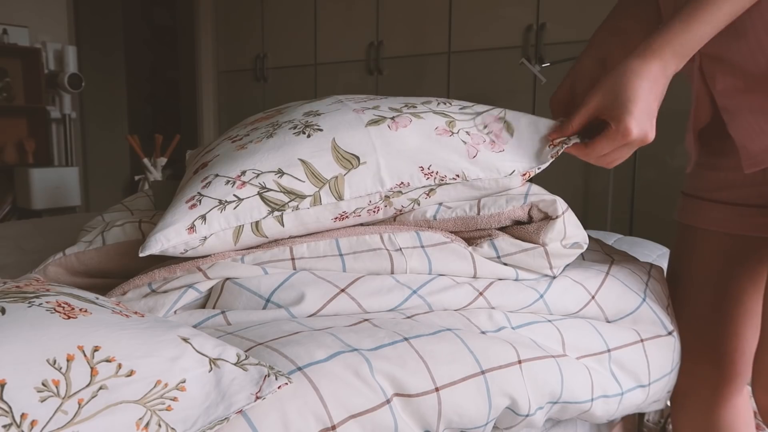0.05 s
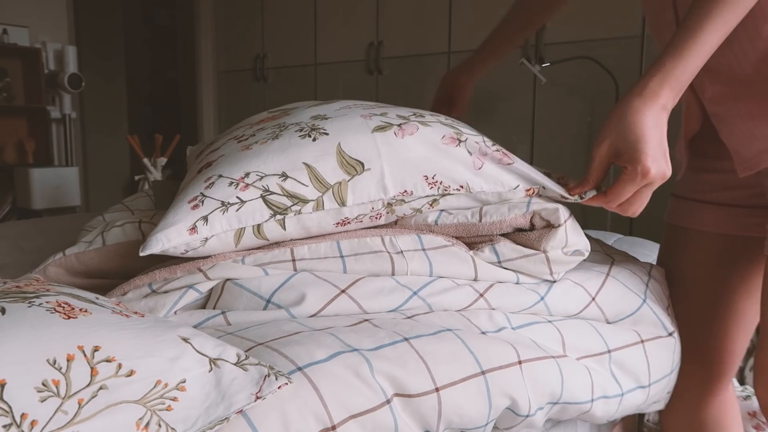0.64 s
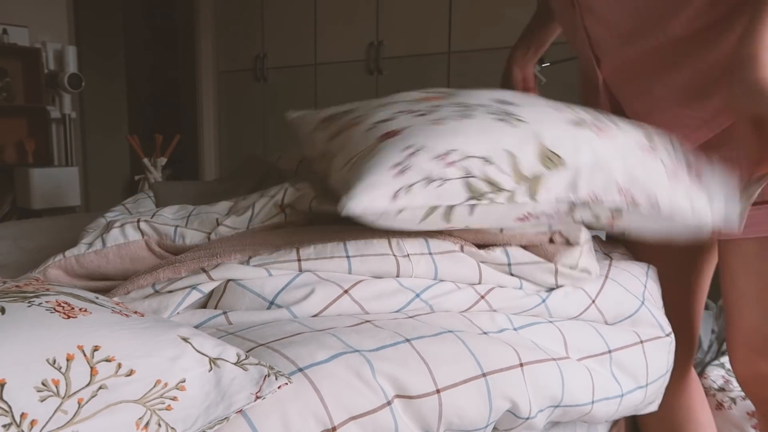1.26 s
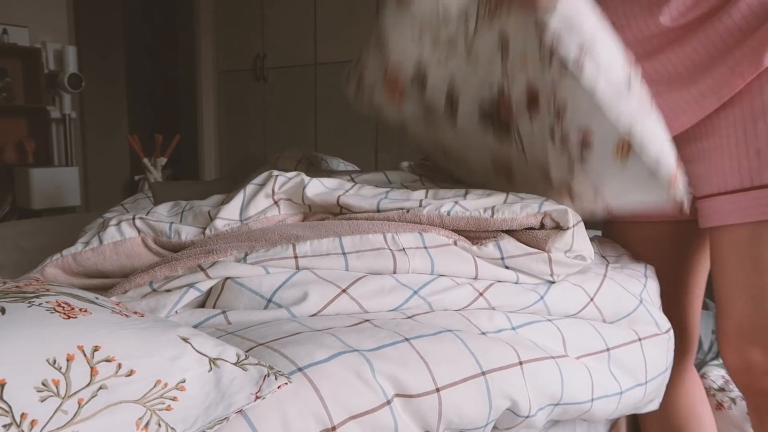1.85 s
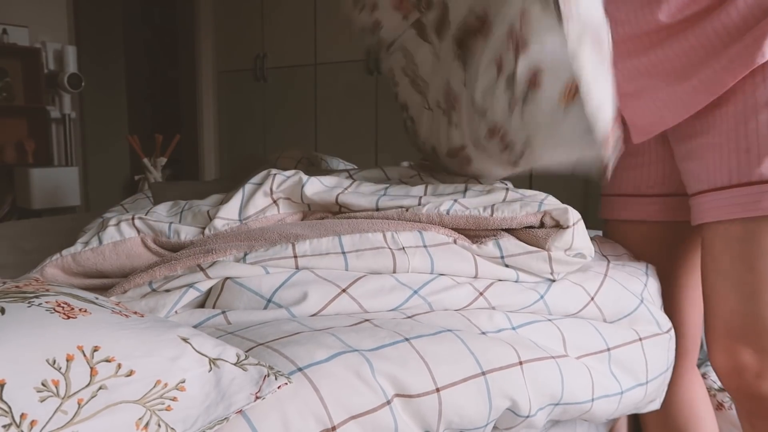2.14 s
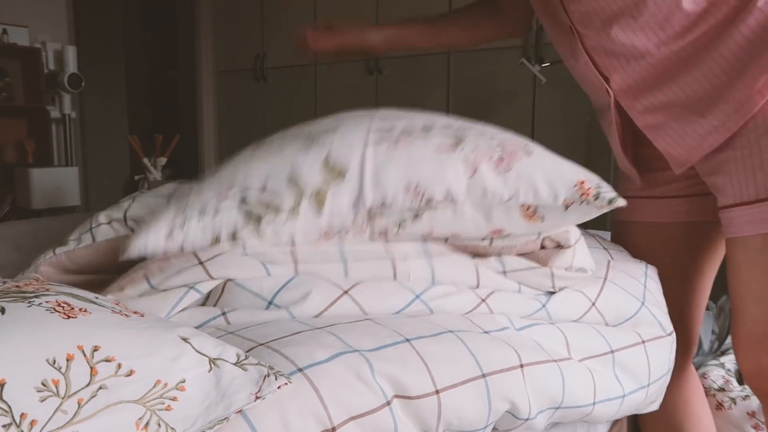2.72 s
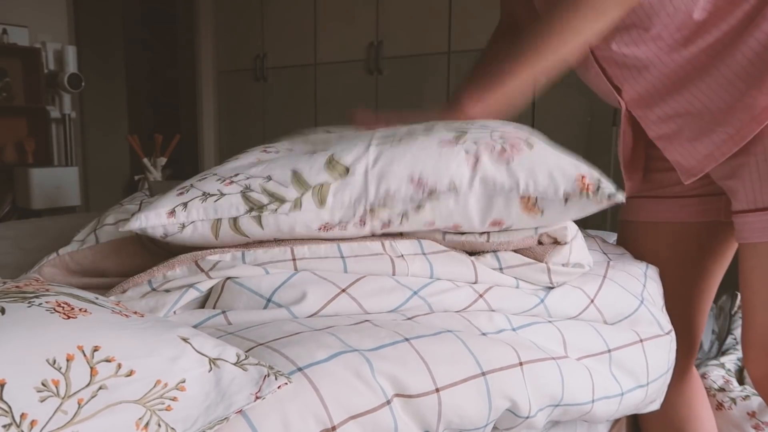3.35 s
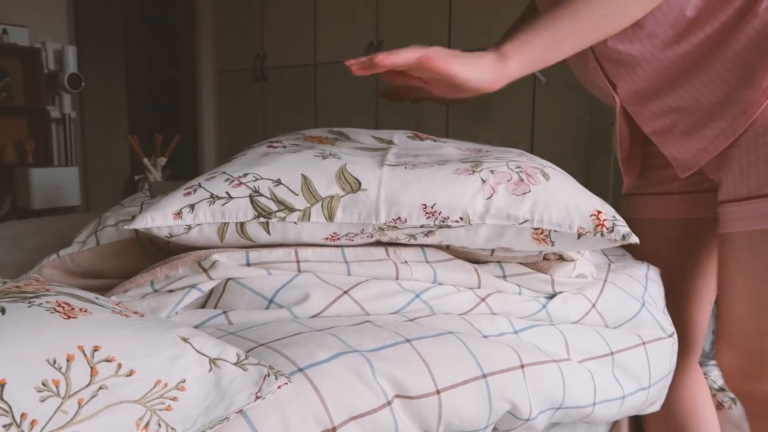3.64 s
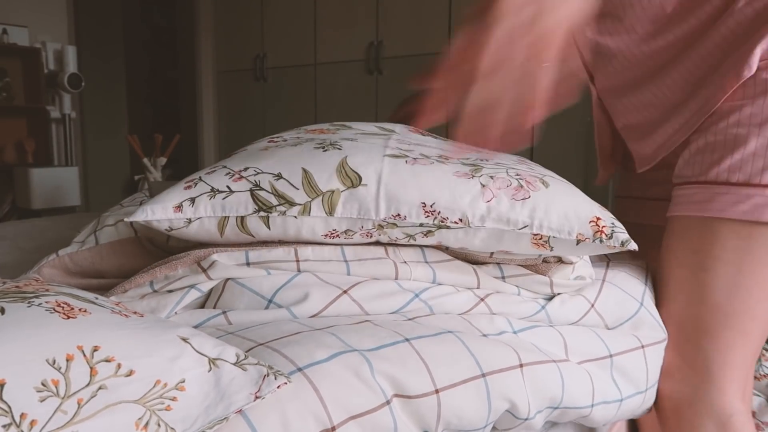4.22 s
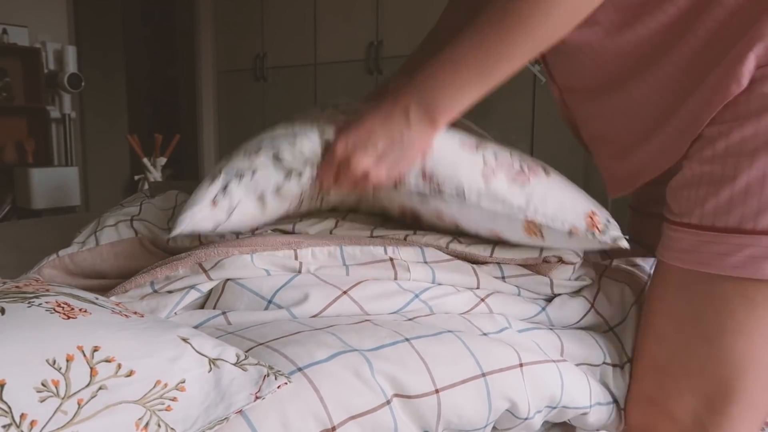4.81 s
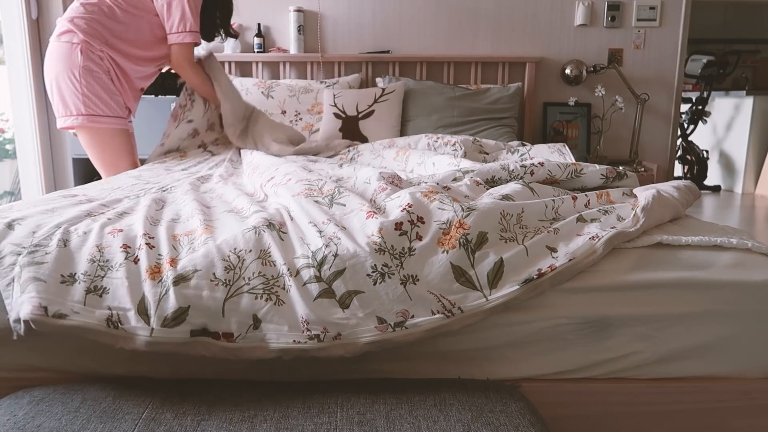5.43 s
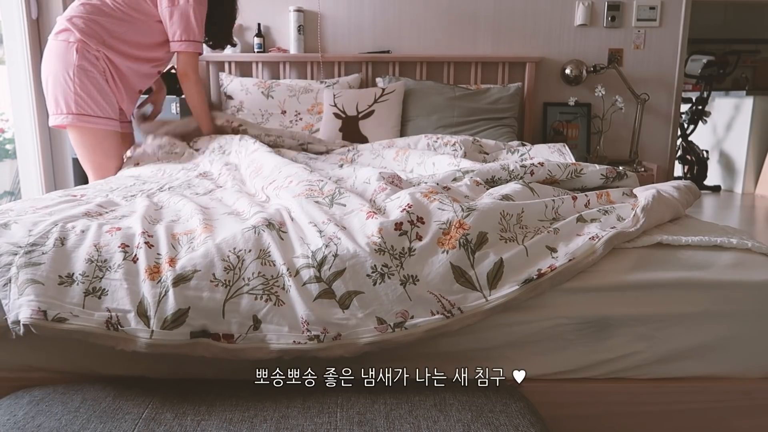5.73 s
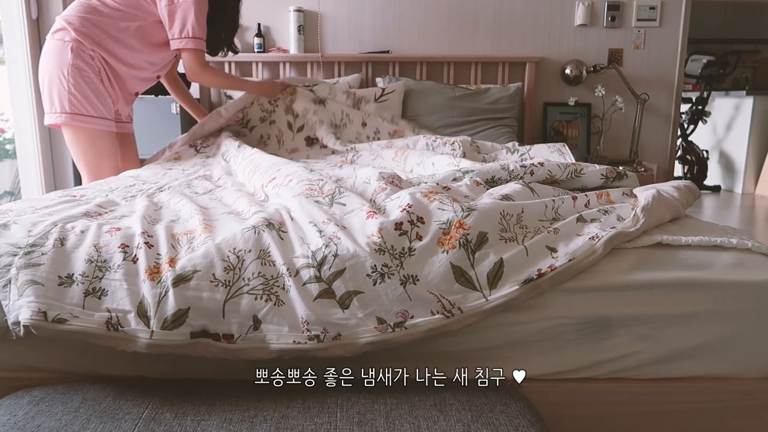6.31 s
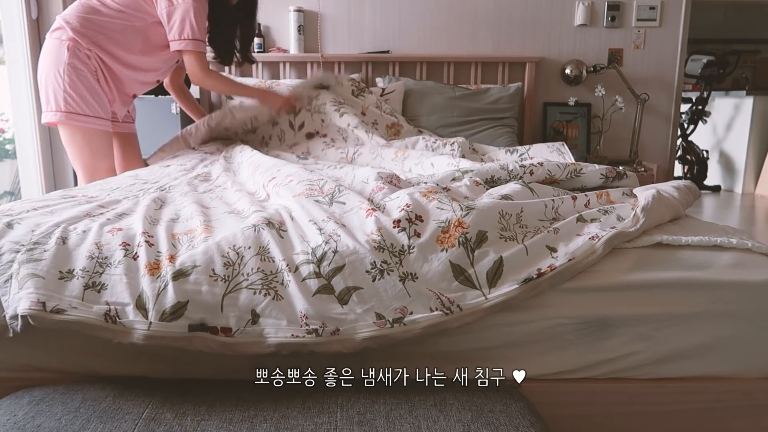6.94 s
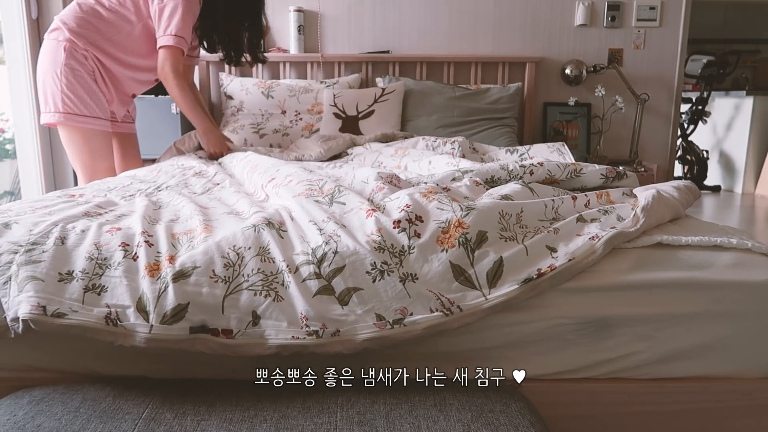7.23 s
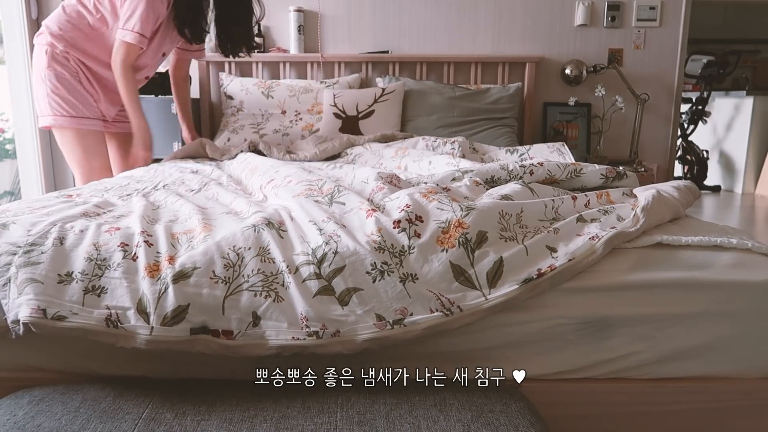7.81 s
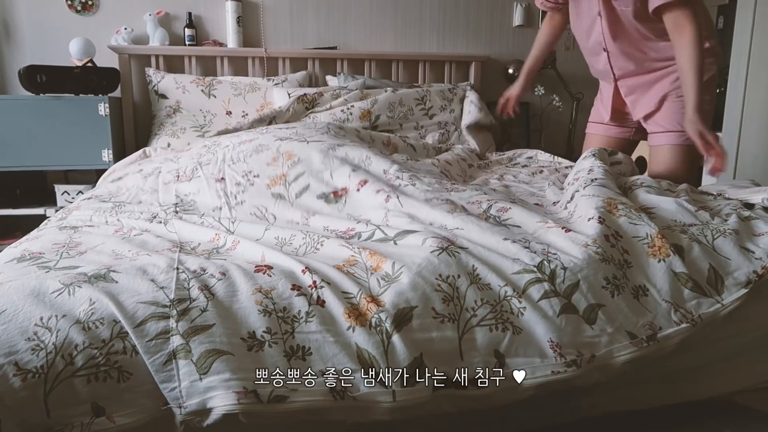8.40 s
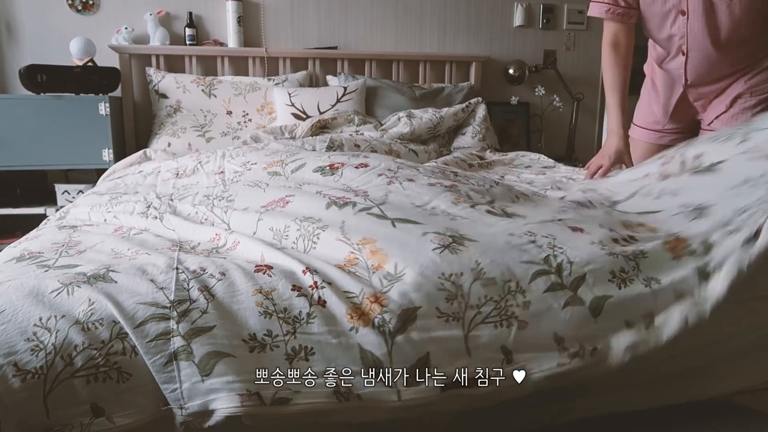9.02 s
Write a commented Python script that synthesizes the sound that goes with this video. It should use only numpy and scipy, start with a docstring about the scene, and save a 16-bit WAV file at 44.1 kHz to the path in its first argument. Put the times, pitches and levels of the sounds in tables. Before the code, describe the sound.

In a quiet bedroom, a pillowcase zip is pulled shut with a brief buzz. Cotton swishes as the pillow is lifted and shaken, then it drops onto the bed with a dull thud. A hand pats it three times close to the microphone, each sharp thump pushing out a puff of air. Afterwards a duvet rustles and flops softly further away over a faint low hum.

```python
"""Making a bed

In a quiet bedroom a pillowcase zip is pulled shut, its slider ticking over the teeth. The pillow is
picked up, shaken and dropped, then patted three times; each pat thumps and presses a hiss of air out
through the cotton. Then the duvet is tugged straight further off, rustling and flopping over a low hum."""
import sys
import numpy as np
from scipy import signal
from scipy.fft import rfft, irfft, next_fast_len
from scipy.io import wavfile
from scipy.ndimage import uniform_filter1d

SR = 44100
rng = np.random.default_rng(int(sys.argv[2]) if len(sys.argv) > 2 else 0)


def dump_mix(stems):
    """Bounce the given channels to the path in sys.argv[1] as a 16-bit WAV at rate SR."""
    frames = np.atleast_2d(stems).T  # one column per channel
    limited = np.clip(frames, -1, 1)  # hard clip at full scale
    pcm = np.round(limited * 32767).astype(np.int16)
    wavfile.write(sys.argv[1], SR, pcm)


N = 399546
T = np.arange(N) / SR


def undb(db):
    """Turn decibels into a gain."""
    return 10 ** (np.asarray(db) / 20)


def unit(x):
    """Scale a sound to an average (rms) level of 1."""
    return x / np.sqrt(np.mean(x ** 2))


def colour(x, points, tilt_db=0):
    """Shape the tone along (pitch_hz, level_db) points, tilted by tilt_db per octave."""
    size = next_fast_len(len(x))
    octave = np.log2(np.maximum(np.fft.rfftfreq(size, 1 / SR), 1))
    hz, db = np.transpose(points)
    gain = undb(np.interp(octave, np.log2(hz), db + tilt_db * np.log2(hz / hz[0])))
    bass_cut = np.minimum(2 ** octave / hz[0], 1) ** 2
    return irfft(rfft(x, size) * gain * bass_cut, size)[:len(x)]


def resonate(x, hz, width):
    """Keep the part of a sound near one pitch."""
    return signal.lfilter(*signal.iirpeak(hz, hz / width, fs=SR), x)


def band(size, hz, width):
    """Noise around one pitch, filtered twice for steep edges."""
    noise = rng.standard_normal(size)
    return unit(resonate(resonate(noise, hz, 0.8 * width), hz, 0.8 * width))


def fade(t, t60):
    """Die away by 60 dB every t60 seconds."""
    return np.exp(-np.log(1000) * t / t60)


def rise(t, rise_s):
    """Climb from 0 and level off at 1."""
    return 1 - np.exp(-t / rise_s)


def bell(middle_s, half_s):
    """A movement gathers speed and slows again."""
    return np.exp(-((T - middle_s) / half_s) ** 2 / 2)


def wobble(rate_hz):
    """A smooth random wobble, about 1 in size."""
    step = max(int(SR / rate_hz), 1)
    stairs = np.repeat(rng.standard_normal(N // step + 1), step)
    return unit(uniform_filter1d(stairs, step)[:N])


def fibres(size, spread_db):
    """Many tiny slips of uneven strength."""
    slips = rng.standard_normal(size)
    return unit(slips * undb(spread_db * np.minimum(rng.exponential(size=size), 2 * np.pi)))


def add(track, start_s, sound):
    """Mix a sound in at a given time."""
    i = int(start_s * SR)
    track[i:i + len(sound)] += sound[:N - i]


def echoes(x, t60, gap_s=0.00304):
    """A wash of reflections that starts after a short gap."""
    t = T[:SR]
    tail = rng.standard_normal(SR) * fade(t, t60) * (t > gap_s)
    return signal.fftconvolve(x, tail / np.linalg.norm(tail))[:N]


def stereo(x, width, direct, t60):
    """Left and right differ: in phase for direct sound, by chance for scattered sound."""
    shifted = signal.hilbert(x, next_fast_len(N)).imag[:N]  # every wave moved a quarter cycle
    scattered = echoes(x * wobble(250), t60, gap_s=0)  # moving cloth keeps changing the scatter
    side = colour(-direct * shifted + np.sqrt(1 - direct ** 2) * scattered, width)
    return np.array([x - side, x + side])


# Tone of the room's air: pitch_hz, level_db
ROOM_AIR = [(22, -22), (35, -0.5), (52, 4), (90, -0.5), (170, -6), (360, -5), (460, -7.5), (540, -12),
            (820, -12), (1100, -16.5), (1500, -15.5), (2400, -16.5), (4000, -26.5), (8200, -34),
            (12000, -43), (15000, -53)]


def room_tone(air_db=-49.5, hum_hz=118, whine_hz=13010, whine_db=-87):
    """Steady air noise, a very thin whine and a wavering hum, plainer by the far side of the bed."""
    air = unit(colour(rng.standard_normal(N), ROOM_AIR)) * undb(air_db + 0.12 * wobble(15))
    hum_db = np.interp(T, [4.8, 5.1, 7.9, 8.1], [-61.5, -53, -52, -78])  # drops away near the end
    hum = np.sin(2 * np.pi * np.cumsum(hum_hz + 11 * wobble(30)) / SR) * undb(hum_db + 2 * wobble(16))
    whine = np.sin(2 * np.pi * np.cumsum(whine_hz + 25 * wobble(40)) / SR) * undb(whine_db)
    return air + np.sqrt(2) * (hum + whine)


def sliding(movements, rest_db):
    """How loud the cloth is: every movement adds to a faint steady stirring."""
    power = sum((undb(db) * bell(s, half_s)) ** 2 for s, half_s, db in movements)
    return np.sqrt(undb(rest_db) ** 2 + power)


# Tone of swishing fibres: pitch_hz, level_db
SWISH_TONE = [(400, -3), (750, -9.5), (1200, -7), (1700, -3.5), (2800, -5), (4000, -10.5), (5900, -18),
              (9800, -32), (12400, -55), (15000, -47)]
# Tone of rumbling folds: pitch_hz, level_db
FOLD_TONE = [(60, 3.5), (130, -1.5), (180, 4.5), (260, 3), (450, -5), (800, -7.5), (1300, -16), (2500, -41)]
# Lifts and tugs that slide cotton over cotton: middle_s, half_length_s, swish_db, rumble_db
SLIDES = [(0.224, 0.15, -61, -73), (1.18, 0.14, -51.5, -74), (1.395, 0.057, -48, -51),
          (1.561, 0.024, -43.5, -49), (1.624, 0.095, -49, -50), (1.882, 0.12, -42.5, -46),
          (2.02, 0.061, -43.5, -50), (2.1, 0.018, -34.5, -42.5), (2.245, 0.065, -39.5, -43),
          (2.381, 0.078, -45.5, -54), (2.733, 0.15, -47.5, -68), (4.237, 0.02, -55, -62),
          (4.355, 0.01, -54, -65), (4.544, 0.036, -50.5, -46.5), (4.65, 0.075, -53.5, -50.5),
          (4.848, 0.082, -51.5, -55), (5.01, 0.018, -54, -60), (5.117, 0.059, -58.5, -52),
          (5.302, 0.044, -56.5, -48.5), (5.57, 0.067, -52.5, -47.5), (5.885, 0.02, -59, -51),
          (6.014, 0.02, -63, -58), (6.26, 0.049, -61, -51.5), (6.385, 0.044, -60, -47.5),
          (6.58, 0.05, -65, -51.5), (6.907, 0.048, -57.5, -44), (6.98, 0.039, -58, -51),
          (7.217, 0.036, -65, -60), (7.55, 0.04, -60, -59), (8.02, 0.045, -56, -46),
          (8.094, 0.036, -54.5, -59), (8.243, 0.025, -61, -57), (8.515, 0.073, -53.5, -67),
          (9.032, 0.091, -60, -50.5)]
# Strokes of a hand over cotton: middle_s, level_db, half_length_s, pitch_hz, width_hz
STROKES = [(1.547, -44, 0.0071, 490, 550), (1.78, -42, 0.031, 700, 603), (1.85, -52.5, 0.1, 800, 600),
           (2.106, -31.5, 0.0049, 700, 900), (2.102, -35.5, 0.005, 2600, 2800),
           (2.3067, -26, 0.003, 690, 700), (2.307, -42, 0.0026, 2980, 2600), (2.315, -37, 0.014, 540, 298),
           (2.83, -34, 0.011, 470, 330), (2.836, -41.5, 0.019, 2300, 2940), (3.892, -47, 0.003, 2200, 2600),
           (5.125, -48, 0.013, 704, 500), (6.904, -60, 0.028, 905, 900), (8.085, -60, 0.022, 2200, 1600),
           (8.44, -57, 0.023, 2500, 2400), (8.49, -58.5, 0.034, 5500, 3020),
           (8.566, -55, 0.017, 2200, 2800), (8.747, -54, 0.028, 1390, 2200)]


def rustle(close, slide_db=-1, catch_db=1.2):
    """Cloth slides in small catches: fibres swish, folds rumble, hand strokes swell and fade."""
    middle_s, half_s, swish_db, rumble_db = np.transpose(SLIDES)
    swish = unit(colour(fibres(N, spread_db=1), SWISH_TONE))
    swish *= sliding(zip(middle_s, half_s, swish_db + slide_db), rest_db=-67)
    folds = unit(colour(fibres(N, spread_db=3.5), FOLD_TONE))
    rest_db = np.interp(close, [0, 1], [-56, -64])  # the duvet stirs more than the pillow
    folds *= sliding(zip(middle_s, half_s, rumble_db + slide_db), rest_db)
    strokes = sum(undb(db) * band(N, hz, width) * bell(s, half) for s, db, half, hz, width in STROKES)
    return (swish + folds + strokes) * undb(catch_db * wobble(60))


# Flops of the pillow or duvet: start_s, level_db, pitch_hz, fade_s
FLOPS = [(1.54, -36, 235, 0.061), (1.954, -35, 243, 0.19), (2.191, -36, 271, 0.085),
         (2.303, -35.5, 139, 0.21), (2.782, -32, 188, 0.097), (2.801, -21, 58, 0.11),
         (2.814, -27.5, 218, 0.09), (3.032, -31, 57.5, 0.37), (3.461, -24.5, 58.6, 0.13),
         (4.005, -35, 267.4, 0.18), (5.117, -37.5, 158, 0.075), (5.311, -46, 159, 0.22),
         (5.426, -43.5, 124, 0.046), (5.604, -45, 115, 0.21), (5.809, -35.5, 69, 0.33),
         (6.537, -43, 129, 0.21), (6.59, -42.5, 133, 0.12), (6.875, -44, 160, 0.21), (6.96, -38, 119, 0.19),
         (7.17, -46.5, 200, 0.11), (7.655, -45.5, 445, 0.092), (8.131, -38, 86, 0.15),
         (8.206, -45.5, 66.5, 0.41), (8.723, -43, 294, 0.06)]


def flops(rise_s=0.0043, looseness=0.64):
    """Heavy bedding pushes out a few slow, uneven waves of air."""
    t, out = T[:SR // 2], np.zeros(N)
    for start_s, db, hz, fade_s in FLOPS:
        shape = rise(t, rise_s) ** 2 * fade(t, fade_s)
        flap_tone = [(hz / 2, -4), (hz, 0), (hz * 2, -8), (hz * 10, -30), (hz * 50, -80)]
        flap = unit(colour(rng.standard_normal(len(t)), flap_tone))
        wave = np.sin(2 * np.pi * hz * t) + looseness * flap
        add(out, start_s, undb(db) * shape / shape.max() * wave)
    return out


# The zip's pull, moment by moment: time_s, tooth_rate_hz, lowest_tone_db, octave_above_db
ZIP_PULL = [(0.33, 485, -57, -65), (0.348, 548, -44.5, -50), (0.41, 1005, -42, -35),
            (0.424, 1002, -58, -37), (0.48, 1125, -47, -45), (0.524, 1181, -35, -34.5),
            (0.56, 1249, -45, -34), (0.582, 1187, -24.5, -31.5), (0.6, 1153, -39.5, -48),
            (0.64, 1114, -34.5, -31), (0.662, 989, -31, -34.5), (0.676, 969, -35, -39),
            (0.724, 1017, -36, -42), (0.756, 984, -33, -39), (0.77, 1002, -27.5, -35.5),
            (0.8, 1415, -42, -40), (0.836, 1437, -37.5, -44), (0.87, 1432, -61, -58)]
# Tone of the zip's overtones: pitch_hz, level_db
ZIP_TONE = [(900, -13), (1400, -18), (2300, 6), (3100, -4), (3900, -8), (4700, -13), (7000, -15),
            (9000, -35)]
# Tone of its rasping tape: pitch_hz, level_db
RASP_TONE = [(200, 6.5), (500, 0.5), (1000, -2), (2200, 3.5), (3400, 1.5), (5000, -3.5), (7200, -8),
             (9500, -15), (11000, -29), (15000, -27)]


def zipper(start_s=0.28, end_s=0.869, attack_s=0.07, release_s=0.05, flutter_db=2.6):
    """The slider ticks over each tooth, so pitch follows speed; the tape rasps after every tick."""
    times, *columns = np.transpose(ZIP_PULL)
    hz, lowest_db, octave_db = [np.interp(T, times, column) for column in columns]
    pull = np.clip((T - start_s) / attack_s, 0, 1) * np.clip((end_s - T) / release_s, 0, 1)
    from_middle_s = np.clip(T, start_s, end_s) - (start_s + end_s) / 2
    # Count the teeth passed. They are uneven, so each tone flutters on its own.
    teeth = np.cumsum(hz * (1 + 0.013 * wobble(450))) / SR + 0.022 * wobble(700)
    low, high = np.zeros(N), np.zeros(N)
    for k, db in [(1, lowest_db + 0.2), (2, octave_db + 1)]:
        low += np.sin(2 * np.pi * k * teeth) * undb(db + flutter_db * wobble(129.4))
    # Overtones and rasp grow with speed and as the tape tightens.
    for k in range(3, 8):
        uneven_db = flutter_db * wobble(169.6) + 2.2 * wobble(30.5)
        tighten_db = 3 * (k + 2.5) * from_middle_s
        high += 2 / k * np.sin(2 * np.pi * k * teeth) * undb(uneven_db + tighten_db)
    high = colour(high, ZIP_TONE) * undb(-38.5) * np.minimum(hz / 1000, 1) ** 2
    buzz = np.sqrt(2) * (low * np.sqrt(pull) + high * pull ** 2)
    rasp = unit(colour(rng.standard_normal(N) * np.exp(-(teeth % 1)), RASP_TONE))
    rasp_db = -44 + 6 * from_middle_s + 3 * np.log2(hz / 1000) + 2.2 * wobble(121.2)
    return buzz + rasp * np.sqrt(pull) * undb(rasp_db)


# Tone of the crunching filling: pitch_hz, level_db
CRUNCH_TONE = [(25, -1), (50, 13.5), (100, -5.5), (160, 6), (280, -3), (550, -4.5), (900, -12), (1300, -16),
               (2000, -18), (4000, -26.5), (8000, -46), (15000, -63)]
# Tone of air pressed through cotton: pitch_hz, level_db
HISS_TONE = [(100, 9), (400, 11), (1000, 3.5), (2200, 1.5), (3500, -1.5), (5500, -5), (8000, -11.5),
             (11000, -19.5), (15000, -31)]
# The pillow is grabbed, shaken, dropped and patted: start_s, crunch_db, tilt_db_per_octave, air_db, sink_s
SQUASHES = [(1.54, -41, 3.5, -61.5, 0.022), (2.096, -38, 3, -39, 0.036), (2.302, -39, 7, -46, 0.022),
            (2.799, -20, 0, -51.5, 0.062), (3.0238, -18.5, 1.7, -32.5, 0.075), (3.4595, -23, 3, -35, 0.1),
            (3.897, -28.5, 1, -32.5, 0.091)]


def squashes(air_fade_s=0.25, brighten_s=0.022):
    """The filling crunches, longer the deeper the hand sinks, and air hisses out through the weave."""
    t, out = T[:SR // 2], np.zeros(N)
    for start_s, crunch_db, tilt_db, air_db, sink_s in SQUASHES:
        crunch = unit(colour(fibres(len(t), spread_db=1), CRUNCH_TONE, tilt_db))
        crunch *= rise(t, 0.0022) * fade(t, 4.14 * sink_s)
        hiss = unit(colour(fibres(len(t), spread_db=3), HISS_TONE))
        hiss *= rise(t, 0.013) * fade(np.maximum(t - sink_s, 0), air_fade_s)
        puff = undb(crunch_db) * crunch + undb(air_db) * hiss
        dull = colour(puff, [(20, 0), (3500, 0), (7000, -8), (14000, -20)])
        add(out, start_s, dull + (puff - dull) * rise(t, brighten_s))
    return out


# Pops of air trapped under the palm: start_s, level_db, pitch_hz, width_hz, fade_s
SMACKS = [(3.033, -27, 830, 380, 0.087), (3.033, -25, 2400, 2950, 0.017), (3.044, -17, 2170, 2380, 0.02),
          (3.461, -27, 2900, 1300, 0.022), (3.465, -19, 1195, 230, 0.15), (3.4652, -13, 1850, 900, 0.014),
          (3.4665, -18, 4130, 1500, 0.0065), (3.897, -24, 950, 298, 0.12), (3.898, -32, 1730, 800, 0.12),
          (3.898, -26, 485, 130, 0.097)]


def smacks(rise_s=0.00038):
    """The pocket of air under the palm rings briefly as it is forced out."""
    t, out = T[:SR // 3], np.zeros(N)
    for start_s, db, hz, width, fade_s in SMACKS:
        add(out, start_s, undb(db) * band(len(t), hz, width) * rise(t, rise_s) * fade(t, fade_s))
    return out


# Pitches at which pillow and bedding ring: pitch_hz, width_hz, level_db
PILLOW_RINGS = [(53.3, 18, 11), (98, 25, 1), (153, 11, 8.5), (214, 43, -0.5), (242, 37, 4.5), (298, 40, -4),
                (463, 15, -18), (662, 20, 5.5), (865, 18, 5.5), (1120, 28, -16), (1306, 58, 0),
                (2020, 220, 1)]
# Fingertips, fingers and palm land in turn, or the pillow hits the bed: time_s, level_db, sharpness_hz
CONTACTS = [(1.5502, -33, 330), (2.1041, -26.5, 600), (2.3068, -24, 480), (2.8058, -21.5, 161),
            (2.816, -26, 111), (3.0265, -20, 450), (3.035, -15.5, 398), (3.0463, -7, 295),
            (3.4612, -18, 260), (3.4635, -21, 520), (3.4662, -17, 1000), (3.4673, -4, 600),
            (3.8892, -34, 300), (3.897, -24.5, 300), (3.8996, -12, 520), (3.907, -37, 700),
            (3.917, -20.5, 260)]


def thumps(ring_db=1):
    """Each contact pushes air and sucks it back, more slowly when softer, and rings the bedding."""
    push = np.zeros(N)
    for time_s, db, hz in CONTACTS:
        age = 2 * np.pi * hz * (T - time_s)
        pulse = -age / (1 + age ** 2) ** 2
        push += undb(db) * pulse / pulse.max()
    ring = sum(undb(db) * resonate(push, hz, width) for hz, width, db in PILLOW_RINGS)
    return push + undb(ring_db) * ring


def snaps(snap_db=-17, fade_s=0.006, rise_s=0.00051):
    """The tight cotton cracks under those same contacts, louder the sharper they land."""
    crack_tone = [(500, -15), (1200, 8), (2400, 0), (4000, 18), (6000, -14), (9000, -24), (14000, -21)]
    t, out = T[:SR // 10], np.zeros(N)
    for time_s, db, hz in CONTACTS:
        crack = unit(colour(rng.standard_normal(len(t)), crack_tone)) * rise(t, rise_s) * fade(t, fade_s)
        add(out, time_s - 2 * rise_s, undb(db + snap_db) * hz / 1000 * crack)
    return out


def hollow(x, dip_db=-13):
    """Weaken two narrow bands between the pillow's ringing pitches, so blows sound hollow."""
    for hz, width in [(184, 30), (550, 80)]:
        x = x - (1 - undb(dip_db)) * resonate(x, hz, width)
    return x


# How much left and right differ for near and for far sounds: pitch_hz, difference_db
NEAR_WIDTH = [(60, -66), (200, -52), (700, -23), (2400, -17), (4400, -5), (8000, 1.5), (11000, 10.5),
              (15000, 11)]
FAR_WIDTH = [(60, -34), (200, -12), (400, -6), (1300, -3.5), (2400, -5.5), (4400, 0), (8000, 1.5),
             (15000, 5.5)]


def scene(lean_right_db=0.65):
    """The pillow sounds close, narrow and a little to the right; duvet and room sound wide."""
    zipped = zipper()
    struck = hollow(thumps()) + snaps()
    squashed = hollow(squashes()) + smacks()
    pillow = undb(-3) * zipped + undb(-8.5) * echoes(zipped, t60=0.29)
    pillow += struck + undb(-7) * echoes(struck, t60=0.25)
    pillow += squashed + undb(-12.5) * echoes(squashed, t60=0.53)
    close = np.interp(T, [4.3, 5], [1, 0])  # the work moves from the pillow to the far side of the bed
    cloth = rustle(close) + flops()
    room = room_tone()
    near = stereo(pillow + close * cloth, NEAR_WIDTH, direct=0.64, t60=0.067)
    far = stereo(room + (1 - close) * cloth, FAR_WIDTH, direct=0.03, t60=0.36)
    balance = undb([[-lean_right_db / 2], [lean_right_db / 2]])
    return near * balance + far


def record(dry):
    """Round off the very loudest peaks and cut the highest treble."""
    ceiling, top_hz = 0.85, 15300
    rounded = dry / (1 + (dry / ceiling) ** 4) ** 0.25
    return signal.sosfilt(signal.ellip(10, 0.2, 80, top_hz, fs=SR, output="sos"), rounded)


dry = scene()
out = record(dry)
dump_mix(out)
```